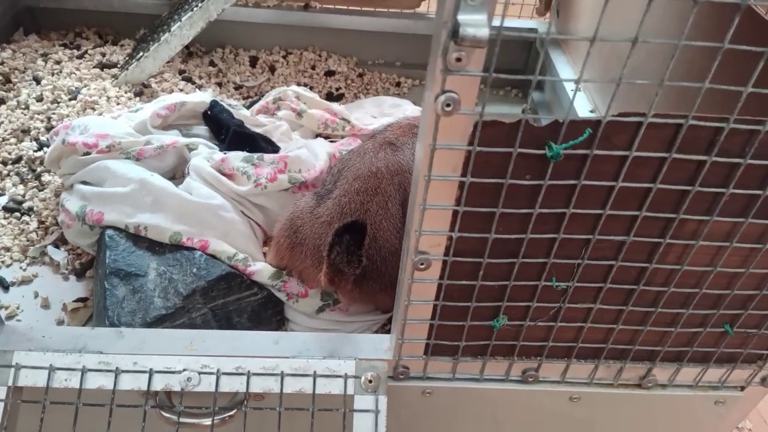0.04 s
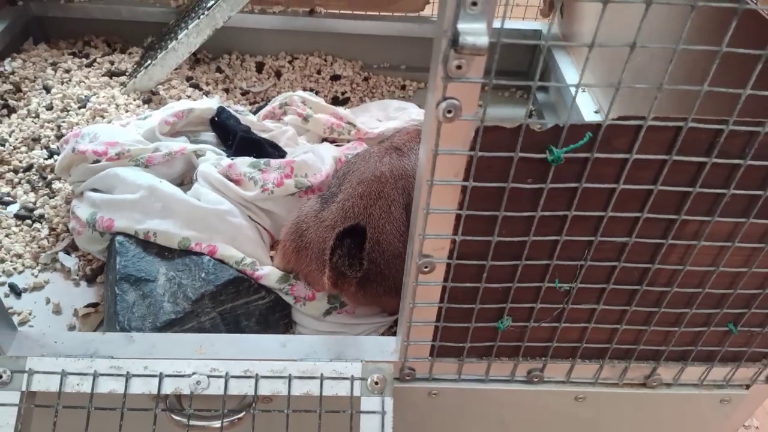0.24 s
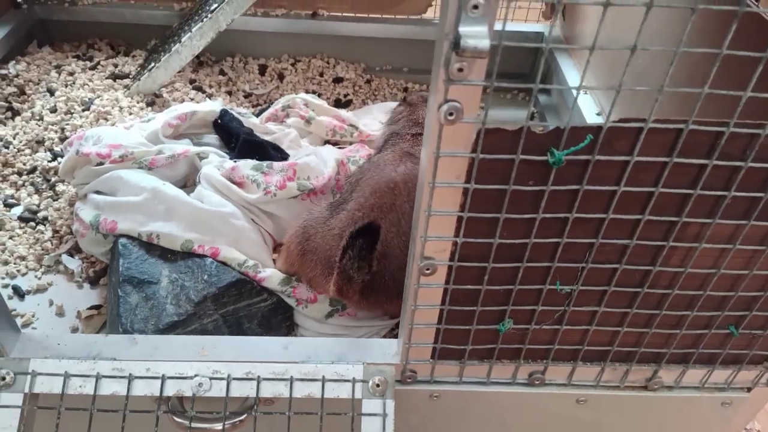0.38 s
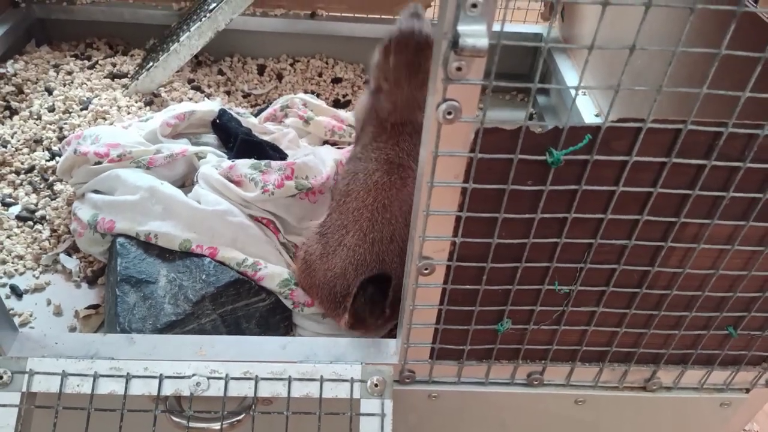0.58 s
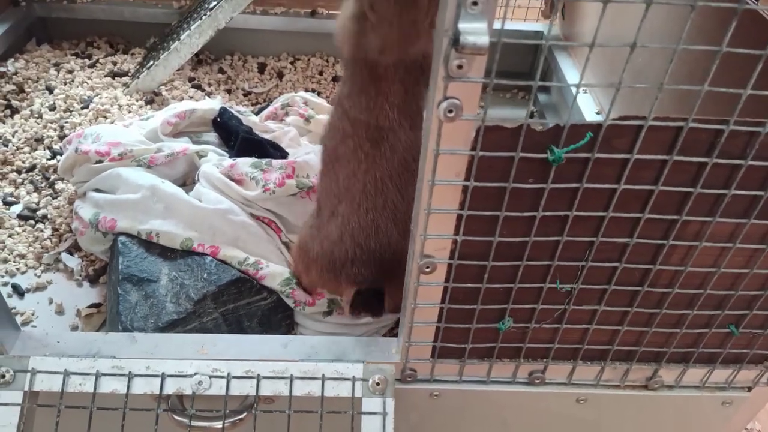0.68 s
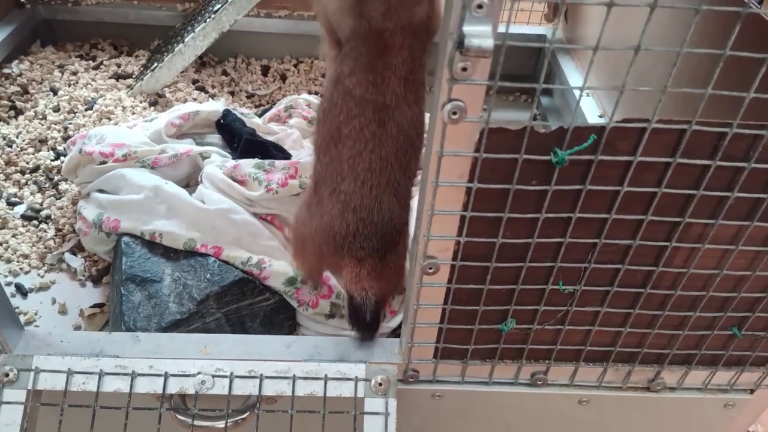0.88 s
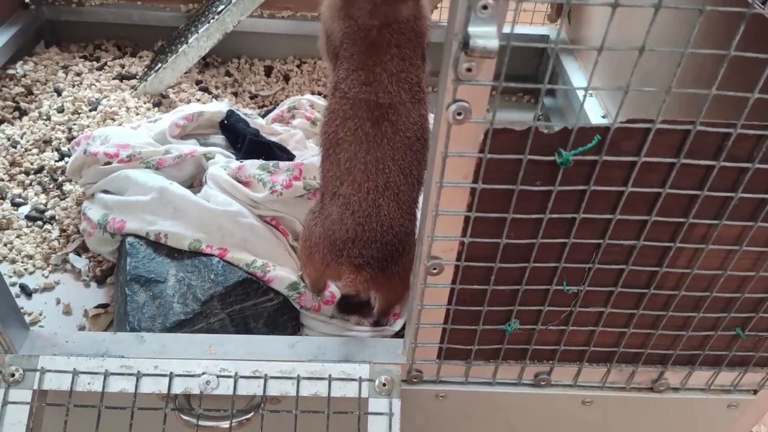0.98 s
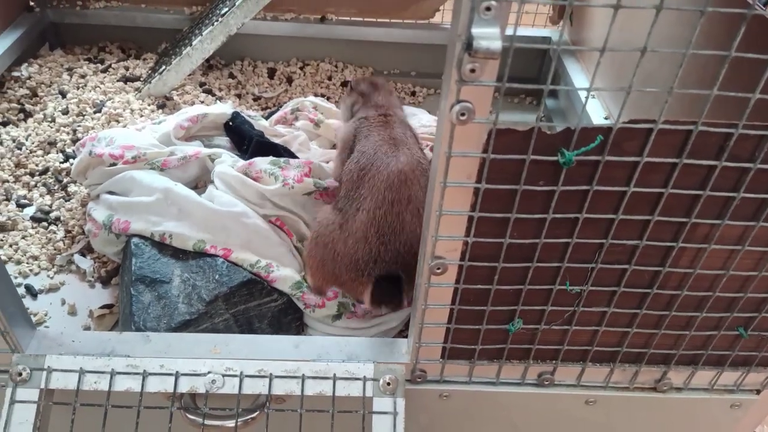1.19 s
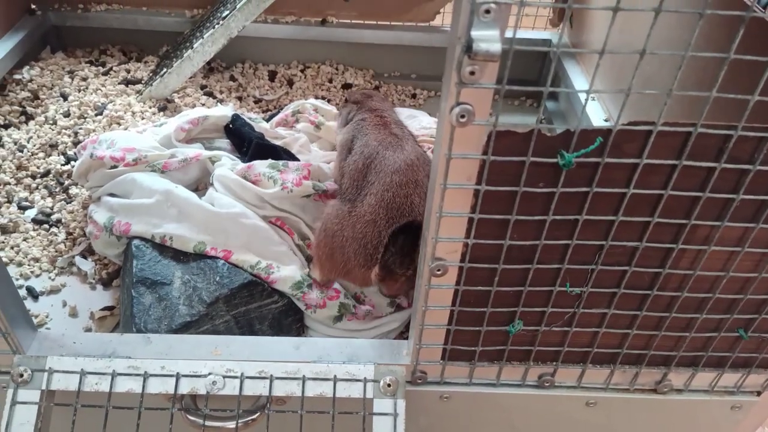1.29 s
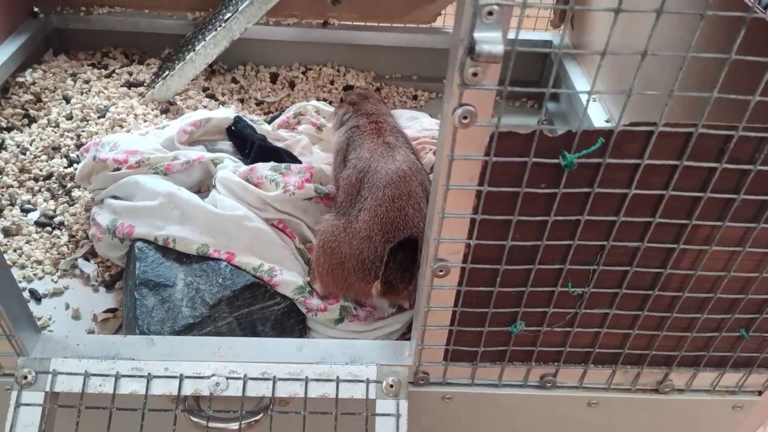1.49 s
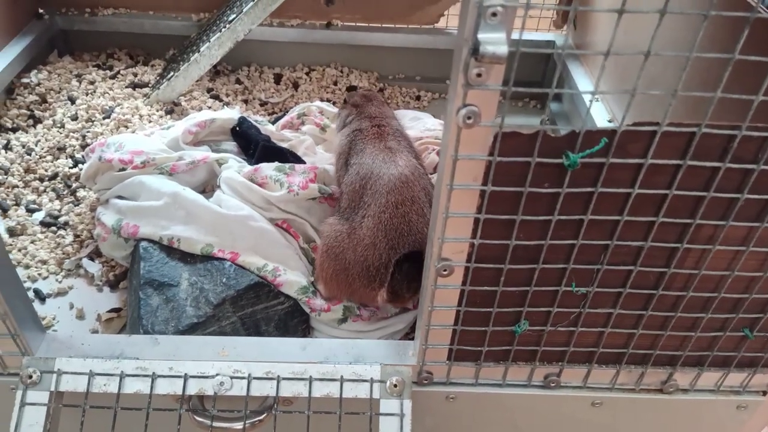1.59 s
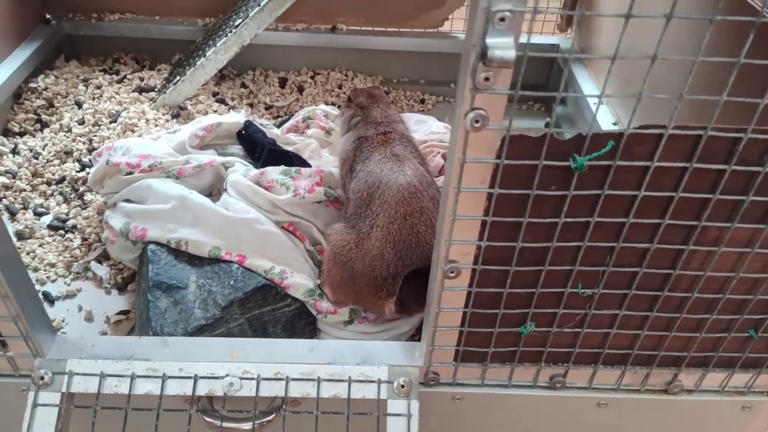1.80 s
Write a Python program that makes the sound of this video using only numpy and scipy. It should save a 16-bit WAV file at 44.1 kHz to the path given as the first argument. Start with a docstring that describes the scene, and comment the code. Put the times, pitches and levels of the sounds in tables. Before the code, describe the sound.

Prairie dog barks with a rough rise and clear yelp, then whimpers and whines in its cage

```python
"""Indoors, in a small hard room: faint wavering hush, and paws thumping a cage floor, as ringing floor modes.
A prairie dog in the wire cage opens low, then gives a two-part yelping bark: a rough rise, a clearer yelp.
Litter and wire rattle in noise bursts around the yelp; a falling whimper, a chirp and a whine follow.
The calls are partials of a pitch plus breath. The wire rings with them, and the last thumps and rattles
close the take. Room reflections sit under the direct sound; a phone microphone thins the deep bass."""
import sys
import numpy as np
from scipy import signal
from scipy.fft import rfft, irfft
from scipy.io import wavfile
from scipy.ndimage import uniform_filter1d

SR = 44100
rng = np.random.default_rng(int(sys.argv[2]) if len(sys.argv) > 2 else 0)


def unload_wav(signal):
    """Save mono or channel-first audio to the path in sys.argv[1] as 16-bit WAV at rate SR, clipped to [-1, 1]."""
    wavfile.write(
        sys.argv[1],
        SR,
        np.round(np.clip(np.atleast_2d(signal).T, -1, 1) * 32767).astype(np.int16),
    )


def ratio(d):
    """dB to gain"""
    e = np.asarray(d, float) / 20
    return 10 ** e


N = 81585  # length in samples

# room noise spectrum: hz, relative density_db
HUSH_SPECTRUM = [(30, -0.5), (150, -5.5), (600, -14.5), (900, -16.5), (1900, -23), (2500, -21), (5000, -22),
                 (7000, -29), (8700, -28.5), (11000, -37.5), (16000, -29)]
HUSH_DB = -74

# paw thumps on the cage floor: start_s, peak_db, centre_hz of the modes that answer, scrabble_decay_s
PAW_THUMPS = [(0.011, -41.5, 451, 0.016), (0.023, -38.5, 324, 0.019), (.06, -50.5, 111, 0.03),
              (0.079, -46, 222, 0.028), (.082, -47.5, 567, 0.0082), (0.216, -50, 205, 0.025),
              (0.298, -55.5, 259, 0.012), (0.375, -31.5, 235, 0.0024), (0.417, -42.5, 430, 0.03),
              (0.589, -37, 285, 0.018), (0.597, -29.5, 250, 0.022), (0.871, -47.5, 403, 0.0036),
              (.9, -47, 201, 0.017), (1.038, -52, 554, 0.0093), (1.55, -50, 545, 0.0065),
              (1.561, -48.5, 125, 0.037), (1.595, -49.5, 130, 0.016), (1.637, -51, 120.7, 0.025),
              (1.696, -48.5, 259.2, 0.017), (1.711, -46, 151.4, 0.0066), (1.8, -62, 129.3, 0.027),
              (1.836, -56.5, 900, 0.0082)]
# resonances of the cage floor, before each thump's random shifts: hz, level_db, t60_s
CAGE_FLOOR_MODES = [(65.5, -20.5, 0.25), (125, -3, 0.19), (202, -0.5, 0.089), (250, 2, 0.055),
                    (313.3, 1.5, 0.093), (400.2, 3.5, 0.13), (509.3, 3, 0.1), (620, -9, .06),
                    (1050, -19, 0.035)]
# loss one octave from the centre, at -30 dB peak or louder; extra loss per dB below that
FOCUS_DB, FOCUS_DB_PER_DB = 8, 0.6
SHORTEST_DECAY_S = 0.002

# decay of the room: hz, t60_s
ROOM_DECAY = [(150, 0.34), (1200, 0.32), (2400, 0.27), (4800, 0.42), (9000, 0.18)]
ROOM_DB, ROOM_GAP_S = -9, 0.0027
THUMP_ROOM_DB = -3.5  # thumps' share sent to the room

# calls: start_s, pitch_hz, level_db, roughness (0-1), mouth_tilt_db per octave above the pitch
OPENING_CALL = [(0.172, 709, -64, 0.19, 0.5), (0.188, 733, -47, 0.46, -5), (0.2, 852, -48, 0.42, -0.5),
                (0.23, 868, -37.5, 0.083, -0.5), (0.262, 885.4, -41.5, 0.07, 0.5)]
RISING_BARK = [(0.262, 887, -49, 0.16, -7.5), (0.29, 1105, -30.5, 0.31, -3), (0.315, 1189, -29, 0.44, 1),
               (0.366, 1284, -27.5, 0.47, 1.5), (0.385, 1227, -31, 0.73, -1.5),
               (0.43, 1194, -31, 0.9, -1.5), (0.452, 1107, -29.5, 0.5, -4), (0.5, 1050, -33.5, 0.6, -2),
               (0.545, 946, -38, 0.3, -5.5)]
YELP_CALL = [(.545, 954, -38.5, 0.11, -6), (.557, 1031, -35, 0.05, -1.5), (.58, 1139, -29, 0.063, -1),
             (.6, 1190, -30.5, 0.15, 1.5), (.639, 1216, -23.5, 0.031, -2.5), (.685, 1186, -27.5, 0.034, 1),
             (.697, 1133, -24, 0.22, -2), (.706, 1009, -35, 0.4, -3), (.714, 967, -47.5, 0.99, 3.5)]
WHIMPER_CALL = [(.72, 1085, -53, 0.81, -12), (.77, 1014, -45.5, 0.66, -11), (.83, 785, -49.5, 0.72, -20.5),
                (.865, 642, -61, 0.56, -21.5)]
CHIRP_CALL = [(1.045, 1006, -45, 0.67, 0.0077), (1.058, 1071, -41.5, 0.29, 0.018),
              (1.072, 1119, -40, 0.35, 0), (1.09, 1175, -41, 0.21, 0), (1.118, 1226, -35.5, 0.14, 0),
              (1.128, 1205, -39.5, 0.92, 0.019), (1.15, 1177, -52, .9, 0.015),
              (1.19, 1211, -60.5, 0.48, 0.025), (1.24, 1220, -66, 0.96, 0.0091)]
WHINE_CALL = [(1.274, 1595, -70, 0.038, -17), (1.284, 1509, -42, 0.13, 3.5),
              (1.334, 1389, -46.5, 0.06, -10), (1.36, 1413, -44.5, 0.027, -0.5),
              (1.4, 1317, -45, 0.085, -2), (1.43, 1258, -48.5, 0.068, -14), (1.455, 1158, -57.5, 0.11, -12),
              (1.475, 1143, -58, 0.12, -17)]
# throat resonance of each call: hz, level_db
OPENING_COLOUR = [(400, -9), (870, -1), (1750, -13), (2600, -12.5), (3450, -21), (4200, -43), (5400, -13.5),
                  (6100, -13), (7000, -54.5), (8300, -20.5), (11000, -50), (15000, -35.5)]
BARK_COLOUR = [(500, -14), (1100, -7.5), (1700, -7), (2400, 7.5), (3500, -1.5), (4700, -4), (6000, -13.5),
               (7000, -27.5), (8500, -28), (10500, -46), (16000, -41.5)]
YELP_COLOUR = [(600, -22.5), (1150, 1.5), (1800, -12), (2400, 3), (3000, -1.5), (3500, -20), (4300, -13),
               (4800, -0.5), (5400, -11.5), (6000, -13.5), (7200, -18), (8400, -20.5), (10500, -42.5),
               (16000, -33)]
CHIRP_COLOUR = [(500, -44), (1150, -8.5), (1700, -15.5), (2400, 11.5), (3700, -22.5), (4800, -7),
                (6700, -33), (8200, -29.5), (10000, -60), (15000, -52)]
WHINE_COLOUR = [(500, 3), (1350, 7.5), (2800, -5), (4300, -26), (5800, -12), (7300, -57), (8600, -19.5),
                (10000, -85), (15000, -42)]
JITTER = 0.03  # pitch spread at full roughness, as a share of the pitch
SHIMMER, SHIMMER_HZ = 0.8, 280  # depth at full roughness and rate, both for low partials; higher ones get more
PATCHY_DB, BREAKUP_DB = 2.5, 4.5  # partial level spread: scales for clear and for rough voice
BREATH_DB, RASP_DB = -4, 5  # breath at full roughness and no tilt; spread of its level
FLUTTER_SHARE = 0.27  # flutter rate as a share of the pitch
ONSET_S, RELEASE_S = 0.0013, 0.0025

# resonances of the wire panel: hz, relative level_db, t60_s
WIRE_PANEL_MODES = [(3580, -10.5, 0.065), (4744, -1.5, .3)]
WIRE_DB = 6.5  # added to all the wire modes

# bursts of litter and wire: start_s, level_db, tilt_db per octave, treble_db, decay_s
RATTLE_BURSTS = [(0.586, -31, 0, -17, 0.0018), (0.594, -19.5, 1, -7, 0.0051),
                 (.5975, -22.5, -3.5, 4, 0.0054), (0.611, -31.5, -0.5, -7, 0.025),
                 (0.883, -40.5, -1, -15.5, 0.01), (0.903, -53, -3.5, 1.5, 0.023),
                 (1.037, -48, -0.5, -41, 0.0083), (1.288, -60, 6, -25, 0.0029),
                 (1.552, -49.5, 4, 6.5, 0.019), (1.586, -51.5, -6, 2, 0.018), (1.688, -54.5, 0, 7.5, .012),
                 (1.838, -58.5, -6, -27, 0.012)]
# spectrum of litter and wire before tilt and treble: hz, relative density_db
RATTLE_SPECTRUM = [(300, 5), (800, 5.5), (2000, 0.5), (3200, 5.5), (4700, 6), (7000, -10.5), (9000, 2.5),
                   (11500, -14.5), (15000, -7.5), (16500, -22)]
TREBLE_HZ = 6500

MIC_LOW_HZ = 65


def unit(x):
    """Scale to rms 1."""
    return x / np.sqrt(np.mean(np.abs(x) ** 2) + 1e-18)


def at_hz(table, hz):
    """Read a (hz, value) table on a log frequency axis."""
    points = np.array(table, float)
    return np.interp(np.log(np.maximum(hz, 1)), np.log(points[:, 0]), points[:, 1])


def colour(x, table, tilt_db=0):
    """Shape a spectrum by table and tilt about 3 kHz, closed well below and above the table; rms 1."""
    hz = np.fft.rfftfreq(len(x), 1 / SR)
    db = at_hz(table, hz) + tilt_db * np.log2(np.maximum(hz, 20) / 3000)
    is_open = (hz > table[0][0] / 2) * (hz < table[-1][0])
    return unit(irfft(rfft(x) * ratio(db) * is_open, len(x)))


def wobble(n, rate_hz):
    """Smooth random motion of rms 1: noise averaged twice over 1 / rate_hz."""
    k = max(int(SR / rate_hz), 1)
    return unit(uniform_filter1d(uniform_filter1d(rng.standard_normal(n), k), k))


def decay(t, t60_s):
    """Exponential fall of 60 dB in t60_s."""
    return np.exp(-np.log(1000) * t / t60_s)


def add(out, x, start_s):
    """Mix x into out from start_s."""
    i = int(start_s * SR)
    out[i:i + len(x)] += x[:len(out) - i]


def hush():
    """Faint room tone: coloured noise whose level wavers."""
    return colour(rng.standard_normal(N), HUSH_SPECTRUM) * ratio(HUSH_DB + 1.1 * wobble(N, 12))


def thumps():
    """Each thump is a short noisy scrabble of paws that rings the damped modes of the cage floor."""
    out = np.zeros(N)
    t = np.arange(SR // 2) / SR
    for start_s, peak_db, centre_hz, decay_s in PAW_THUMPS:
        shifts = rng.standard_normal((len(CAGE_FLOOR_MODES), 2))
        # softer touches wake fewer modes
        focus_db = FOCUS_DB + FOCUS_DB_PER_DB * max(-30 - peak_db, 0)
        ring = 0
        for (hz, db, t60_s), (level_shift_db, pitch_shift) in zip(CAGE_FLOOR_MODES, shifts):
            gain = ratio(db + level_shift_db - focus_db * np.log2(hz / centre_hz) ** 2)
            mode_hz = hz * (1 + 0.043 * pitch_shift)
            ring = ring + gain * np.sin(2 * np.pi * mode_hz * t) * decay(t, t60_s)
        scrabble = rng.standard_normal(len(t)) * np.exp(-t / max(decay_s, SHORTEST_DECAY_S))
        thump = signal.fftconvolve(scrabble, ring)[:len(t)]
        add(out, thump / np.abs(thump).max() * ratio(peak_db), start_s)
    return out


def room(x):
    """Dense reflections: octave bands of noise, each fading at its own rate, after a short gap."""
    t = np.arange(int(0.8 * SR)) / SR
    tail = 0
    for low_hz in 60 * 2.0 ** np.arange(8):
        octave = signal.butter(2, [low_hz, 2 * low_hz], "bandpass", fs=SR, output="sos")
        band = signal.sosfilt(octave, rng.standard_normal(len(t)))
        tail = tail + band * decay(t, at_hz(ROOM_DECAY, 1.68 * low_hz))
    # silent for the gap, then fading in over the same time
    tail = tail * np.clip(t / ROOM_GAP_S - 1, 0, 1)
    return signal.fftconvolve(x, tail / np.sqrt(np.sum(tail ** 2)))[:N] * ratio(ROOM_DB)


def call(rows, throat, half_db, flutter):
    """Vocal folds through the throat: rough cycles smear the partials, half lines and flutter join in."""
    rows = np.array(rows, float)
    start_s, end_s = rows[0, 0], rows[-1, 0]
    t = np.arange(start_s, end_s + RELEASE_S, 1 / SR)
    n = len(t)
    pitch_hz, level_db, rough, tilt_db = (np.interp(t, rows[:, 0], rows[:, c]) for c in range(1, 5))
    rough = np.clip(rough, 0, 1)
    phase = 2 * np.pi * np.cumsum(pitch_hz * (1 + JITTER * rough * wobble(n, 280))) / SR

    voice, power = 0, 0
    for k in np.arange(1, 28) / 2:  # multiples of the pitch, half lines between
        gain_db = at_hz(throat, k * pitch_hz) + tilt_db * np.log2(k) + (half_db if k % 1 else 0)
        gain = ratio(gain_db) * (k * pitch_hz < throat[-1][0])
        # higher partials are smeared wider and deeper
        spread_hz = SHIMMER_HZ * max(k - 1, 1)
        depth = SHIMMER * rough * max(k - 1, 1)
        smear = wobble(n, spread_hz) + 1j * wobble(n, spread_hz)
        shake = (1 + depth * smear) / np.sqrt(1 + 2 * depth ** 2)
        # clear voice is patchy in high partials, rough voice breaks up mostly in low ones
        patchy_db = PATCHY_DB * np.log2(1 + max(k - 2, 0)) * (1 - rough) ** 2
        breakup_db = BREAKUP_DB * rough / max(k, 1)
        patch = ratio((patchy_db + breakup_db) * wobble(n, 63))
        voice = voice + gain * patch * np.imag(shake * np.exp(1j * k * phase))
        power = power + gain ** 2 / 2

    breath = colour(rng.standard_normal(n), throat) * rough
    breath = breath * ratio(BREATH_DB + tilt_db + RASP_DB * wobble(n, 300))
    flutter_depth = flutter * rough ** 2
    flutter_wave = np.cos(FLUTTER_SHARE * phase + 1.66 * wobble(n, 53))
    voice = voice * (1 + flutter_depth * flutter_wave) / np.sqrt(1 + flutter_depth ** 2 / 2)
    gate = np.clip((t - start_s) / ONSET_S, 0, 1) * np.clip((end_s - t) / RELEASE_S + 1, 0, 1)
    out = np.zeros(N)
    add(out, (voice / np.sqrt(power) + breath) * ratio(level_db) * gate, start_s)
    return out


def voices():
    """All the calls, each with its throat colour, half-line level and flutter depth at full roughness."""
    return (call(OPENING_CALL, OPENING_COLOUR, half_db=-14.5, flutter=0.5)
            + call(RISING_BARK, BARK_COLOUR, half_db=-22, flutter=2.5)
            + call(YELP_CALL, YELP_COLOUR, half_db=-13, flutter=0.85)
            + call(WHIMPER_CALL, YELP_COLOUR, half_db=-26.5, flutter=0.88)
            + call(CHIRP_CALL, CHIRP_COLOUR, half_db=-22, flutter=4)
            + call(WHINE_CALL, WHINE_COLOUR, half_db=-55, flutter=1))


def wire(x):
    """The wire panel, driven by the sound x, rings along at its own pitches."""
    t = np.arange(SR // 2) / SR
    ring = 0
    for hz, db, t60_s in WIRE_PANEL_MODES:
        per_sample = 2 * np.log(1000) / (t60_s * SR)  # evens out gain at resonance
        ring = ring + ratio(db) * np.sin(2 * np.pi * hz * t) * decay(t, t60_s) * per_sample
    return signal.fftconvolve(x, ring)[:N] * ratio(WIRE_DB)


def rattles():
    """Grainy, decaying noise bursts of litter and wire; bedding muffles some."""
    out = np.zeros(N)
    t = np.arange(SR // 4) / SR
    for start_s, level_db, tilt_db, treble_db, decay_s in RATTLE_BURSTS:
        fade = np.exp(-t / max(decay_s, SHORTEST_DECAY_S)) * np.minimum(t / 0.00093, 1)
        grain = ratio(level_db + 1.44 * wobble(len(t), 390))
        table = [(hz, db + treble_db * (hz > TREBLE_HZ)) for hz, db in RATTLE_SPECTRUM]
        add(out, colour(rng.standard_normal(len(t)), table, tilt_db) * fade * grain, start_s)
    return out


def scene():
    """Voice, rattles and paws, with the wire ringing and the room behind, over the hush."""
    floor = thumps()
    air = voices() + rattles()
    air = air + wire(air)
    reflections = room(air + floor * ratio(THUMP_ROOM_DB))
    return (air + floor + reflections + hush())[None]


def low_pass(x):
    """Removes everything above the highest recorded frequency."""
    return signal.sosfilt(signal.butter(12, 16830, fs=SR, output="sos"), x)


def record(dry):
    """The phone microphone loses the deep bass."""
    low_cut = signal.butter(3, MIC_LOW_HZ, "highpass", fs=SR, output="sos")
    heard = signal.sosfilt(low_cut, dry)
    return low_pass(heard)


dry = scene()
out = record(dry)
unload_wav(out)
```